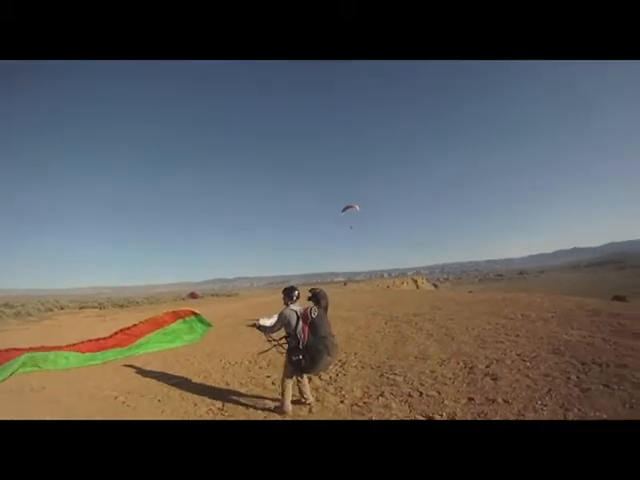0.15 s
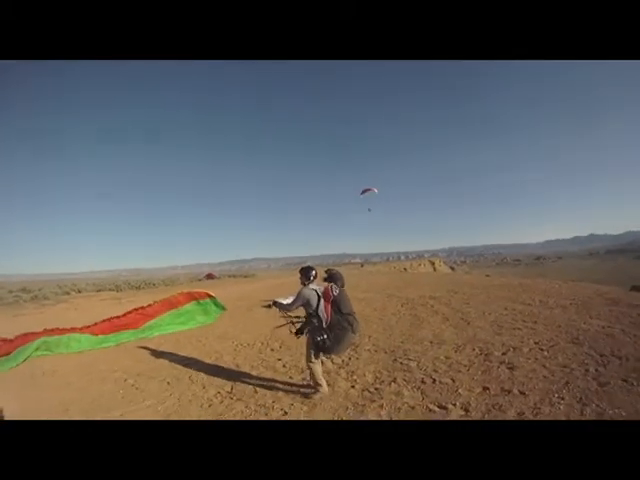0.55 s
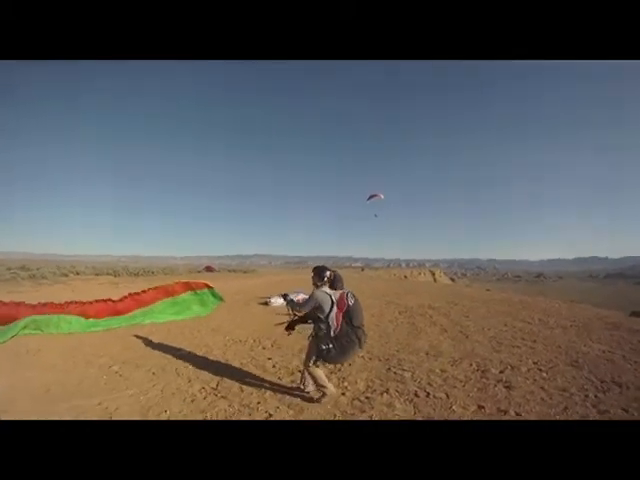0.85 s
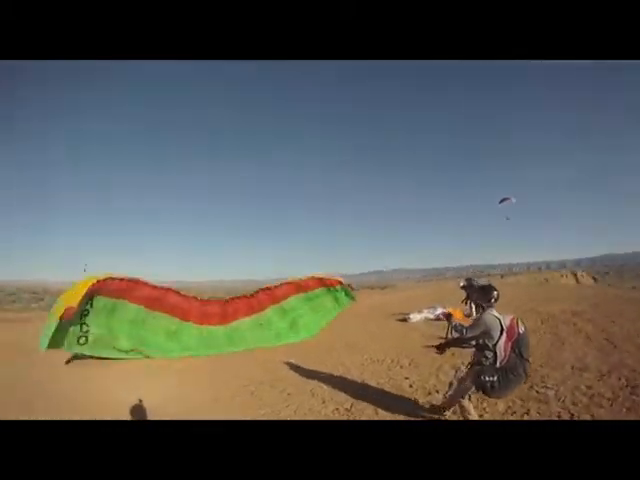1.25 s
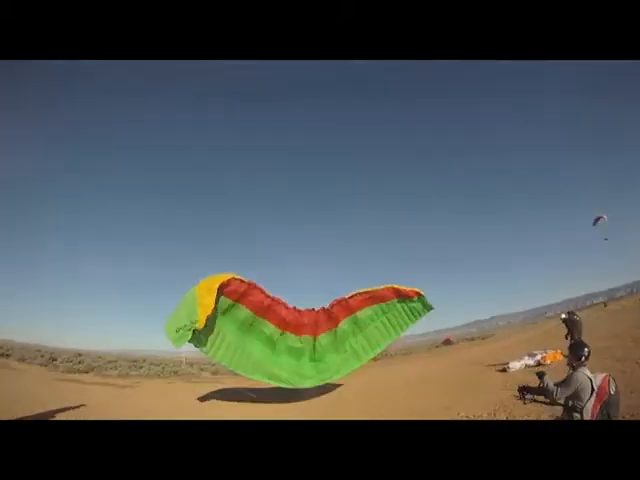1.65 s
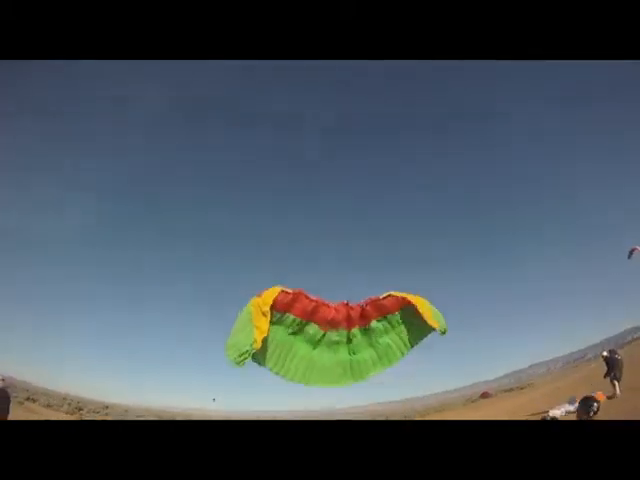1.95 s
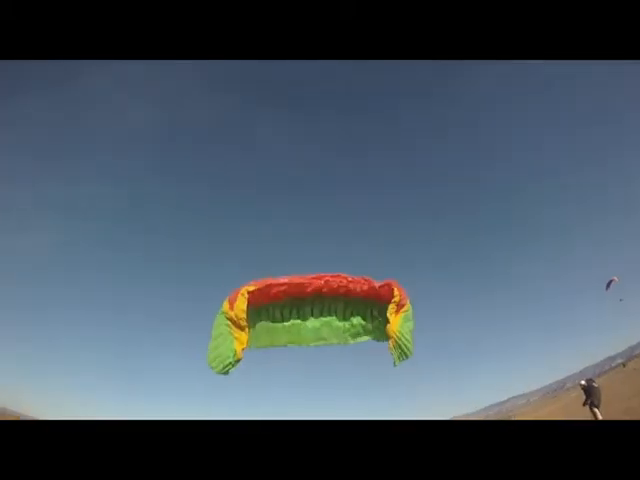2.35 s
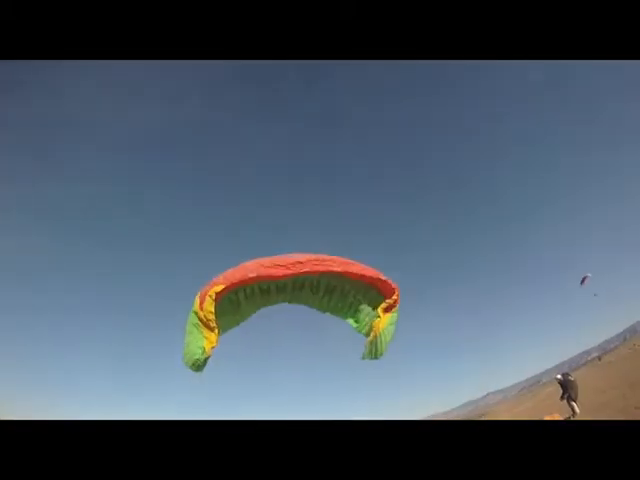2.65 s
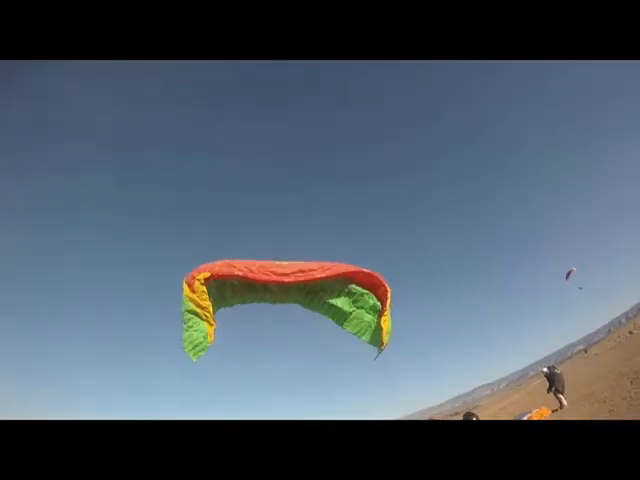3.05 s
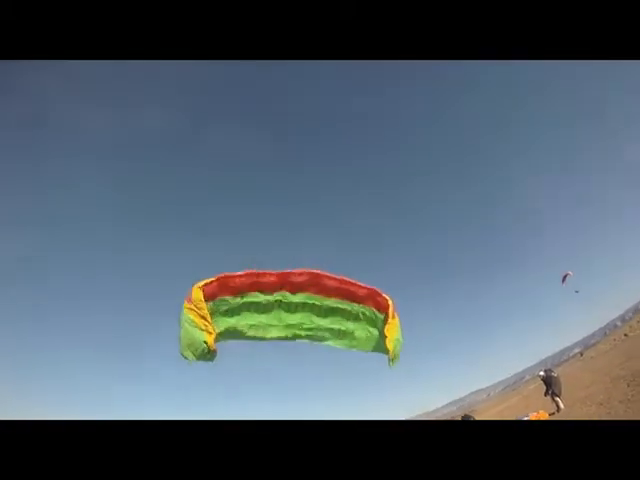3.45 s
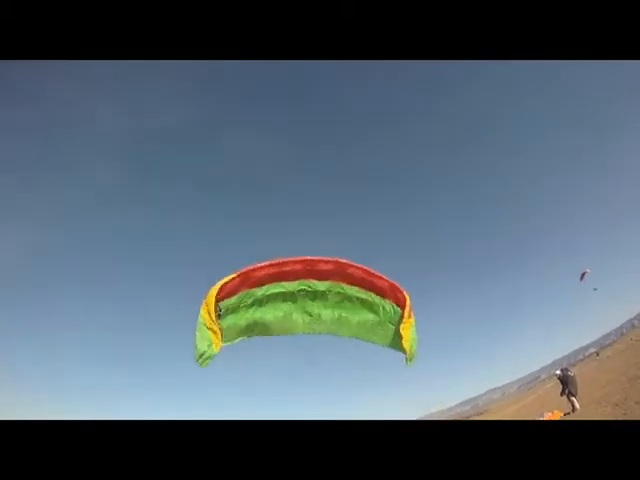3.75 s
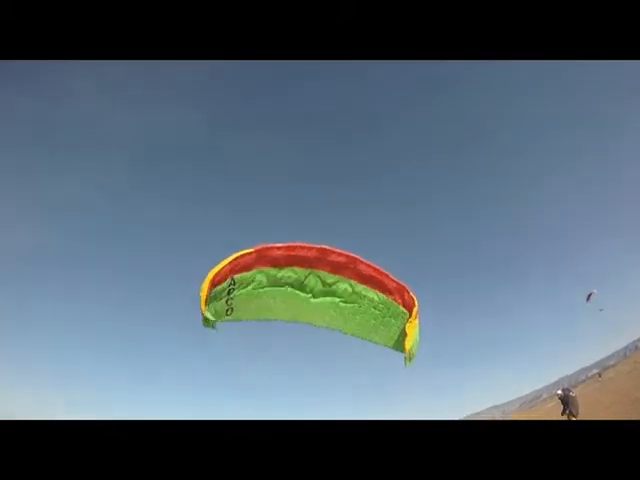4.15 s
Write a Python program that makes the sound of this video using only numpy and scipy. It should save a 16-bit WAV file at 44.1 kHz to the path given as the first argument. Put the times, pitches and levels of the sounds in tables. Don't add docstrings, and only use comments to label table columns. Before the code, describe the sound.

Outdoors on a dry, windy ridge, heard by a microphone inside a closed plastic case, so the higher sounds are boxy and coloured. From the start, deep irregular buffeting and a wandering low hum around 100 Hz pulse under faint hiss and light cloth rustle; a tiny tick comes at 0.06 s. Around 0.9 s a heavy slow gust heaves, with small ticks at 0.95 s and rougher flutter near 1.1 s. From 0.8 to 1.6 s the wing edge scrapes the soil, brightening as it lifts, while nylon crinkling and air rush grow. Crisp clicks come at 1.54 and 1.6 s, with a strong gust at 1.7 s. At 2.0 s a hard, very loud crack strikes the case, with a brief plastic ring and rattle. Then the wind eases while fabric rustle swells around 2.7 and 3.5 s; gusts thump near 3.3-3.4 s, a faint tick follows at 3.55 s, and the rustle continues to the end.

```python
import sys
import numpy as np
from scipy import signal
from scipy.fft import rfft, irfft, next_fast_len
from scipy.io import wavfile
from scipy.ndimage import uniform_filter1d, map_coordinates

SR = 44100
rng = np.random.default_rng(int(sys.argv[2]) if len(sys.argv) > 2 else 0)


def int16_out(signal):
    q = np.round(np.clip(np.atleast_2d(signal).T, -1, 1) * 32767)
    wavfile.write(sys.argv[1], SR, q.astype(np.int16))


def volts(x):
    e = np.asarray(x, float) / 20
    return 10 ** e


N = 189786
TIME = np.arange(N) / SR


def unit(x):
    return x / np.sqrt(np.mean(x ** 2) + 1e-20)


def along(points, hz):
    f, v = np.transpose(points)
    return np.interp(np.log(hz + 1), np.log(f + 1), v)


def curve(points):
    s, value = np.transpose(points)
    return np.interp(TIME, s, value)


def bump(s, half):
    return np.exp(-((TIME - s) / half) ** 2)


def wobble(rate):
    knots = rng.standard_normal(int(N * rate / SR) + 4)
    return map_coordinates(knots, [np.arange(N) * rate / SR])


def filtered(x, response):
    m = 2 * next_fast_len(N // 2 + SR // 4)
    return irfft(rfft(x, m) * response(np.fft.rfftfreq(m, 1 / SR)), m)[..., :N]


def shaped_noise(points):
    return filtered(rng.standard_normal(N), lambda hz: volts(along(points, hz)))


def patchy(patchy_db):
    z = signal.stft(rng.standard_normal(N), nperseg=512)[2]
    field = uniform_filter1d(rng.standard_normal(z.shape), 6, 0)
    field = uniform_filter1d(field, 10, 1)
    return signal.istft(z * volts(patchy_db * unit(field)), nperseg=512)[1][:N]


# [f/Hz, width/Hz, level/dB]
CASE_PEAKS = [(1195, 157, -4.5), (1576, 260, -9), (2149, 394, 0.5), (2790, 270, -10.5), (3032, 144, -8.5),
              (3320, 210, -10), (3553, 190, -6), (4063, 450, -10), (4900, 447, -13.5), (5345, 450, -14),
              (6590, 460, -17), (7060, 510, -16.5), (7910, 430, -17), (8470, 195, -14), (9000, 440, -16),
              (9800, 356, -12), (10350, 110, -23.5), (10770, 120, -22), (12000, 72, -38.5),
              (12200, 80, -30), (12600, 200, -36), (13160, 170, -24.5), (13700, 260, -24.5),
              (14280, 330, -15.5), (14640, 540, -19.5)]
# [f/Hz, width/Hz, level/dB]
CASE_NOTCHES = [(1367, 94, -6.5), (1894, 76, -5.5), (6030, 360, -10), (11500, 360, -7), (12200, 80, -12),
                (10640, 80, -7.5), (13400, 80, -5)]


def case(hz):
    grid = np.fft.rfftfreq(8192, 1 / SR)
    power = volts(-90)
    for c, width, db in CASE_PEAKS:
        power = power + volts(2 * db) / (1 + (2 * (grid - c) / width) ** 2) ** 1.57
    dips = sum(db / (1 + (2 * (grid - c) / width) ** 2) for c, width, db in CASE_NOTCHES)
    cepstrum = irfft(np.log(np.sqrt(power) * volts(dips)))
    half = len(cepstrum) // 2
    cepstrum[1:half] *= 2
    cepstrum[half + 1:] = 0
    impulse = irfft(np.exp(rfft(cepstrum)))
    return rfft(impulse, 2 * len(hz) - 2)


def through_case(x, points):
    return filtered(x, lambda hz: volts(along(points, hz)) * case(hz))


# [f/Hz, level/dB per Hz]
HISS_SPECTRUM = [(200, -7.5), (1000, -8.5), (3000, -15.5), (6000, -40.5), (8000, -34.5), (11000, -33.5),
                 (16000, -30)]


def microphone_hiss():
    return volts(-63.5) * unit(shaped_noise(HISS_SPECTRUM))


# [f/Hz, level/dB per Hz]
FAR_SPECTRUM = [(500, 10), (2000, -5.5), (4000, -7), (9000, 0), (11500, 16), (12500, 12), (16000, 1)]


def distant_wind():
    return volts(-70.5) * unit(through_case(patchy(patchy_db=2.0), FAR_SPECTRUM))


# [t/s, level/dB]
DRAG_LEVEL = [(0, -99), (.8, -73), (1.05, -67), (1.25, -62), (1.45, -60.5), (1.7, -82), (4.3, -94)]
# [f/Hz, level/dB per Hz]
SLIDE_SPECTRUM = [(3000, -31.5), (4400, 3.5), (5100, 2), (5600, -26), (6400, -16), (7300, 4), (8400, -2),
                  (10000, -27.5)]
# [t/s, share of the high colour]
LIFT = [(1.0, 0.1), (1.5, 0.9)]


def dragging_edge():
    low_scale, high_scale = 0.957, 1.04
    noise = patchy(patchy_db=3.0)
    low = filtered(noise, lambda hz: volts(along(SLIDE_SPECTRUM, hz / low_scale)) * case(hz))
    high = filtered(noise, lambda hz: volts(along(SLIDE_SPECTRUM, hz / high_scale)) * case(hz))
    lift = curve(LIFT)
    return volts(curve(DRAG_LEVEL)) * unit((1 - lift) * low + lift * high)


# [t/s, peak level/dB, t60/s, lowest f/Hz, highest f/Hz]
TICK_EVENTS = [(.0617, -33.5, .012, 3320, 3780), (.0617, -33, .014, 8200, 8840),
               (0.062, -39.5, .01, 4500, 8000), (.9465, -39, 0.019, 2800, 9000),
               (.9505, -35, 0.0071, 3020, 15000), (.9553, -40, .024, 2900, 15000),
               (1.5425, -36, 0.044, 900, 1500), (1.5425, -38, 0.02, 4000, 11000),
               (1.603, -41, .03, 2500, 12000), (1.608, -35.5, 0.014, 2500, 12000),
               (1.6122, -28, .0062, 2000, 16000), (1.6155, -31, 0.0049, 2000, 16000),
               (2.17, -56, .0087, 2500, 12000), (3.555, -44, 0.052, 2500, 11000),
               (3.728, -56, .0072, 2500, 12000)]


def ticks():
    rise_share = 0.043
    strap_db, strap_hz = -24, 9000
    out = np.zeros(N + SR)
    t = np.arange(SR // 10) / SR
    for s, db, t60, low_hz, high_hz in TICK_EVENTS:
        rise = 1 - np.exp(-t / (rise_share * t60))
        burst = rng.standard_normal(len(t)) * rise * volts(db + 18.5 - 60 * t / t60)
        band = signal.butter(2, [low_hz, high_hz], "band", fs=SR, output="sos")
        out[round(s * SR):][:len(t)] += signal.sosfilt(band, burst)
    return filtered(out[:N], lambda hz: case(hz) + volts(strap_db) / (1 + (hz / strap_hz) ** 8))


# [t/s, level/dB]
WING_LOAD = [(0, -66), (.62, -63), (.98, -62.5), (1.2, -56), (1.4, -54.5), (1.52, -52), (1.68, -54.5),
             (2.0, -55.5), (2.5, -55.5), (2.68, -53), (3.0, -57), (3.28, -57), (3.42, -53.5), (3.56, -52.5),
             (3.66, -58.5), (3.8, -56.5), (4.0, -60), (4.22, -56)]
# [f/Hz, level/dB per Hz]
RUSH_SPECTRUM = [(300, 10), (700, 1), (2500, 0), (3200, -6), (6000, -17.5), (16000, -41)]


def wing_rush():
    rush = through_case(patchy(patchy_db=0.4), RUSH_SPECTRUM)
    return volts(curve(WING_LOAD) + 1.5) * unit(rush)


# [f/Hz, level/dB per Hz]
COARSE_SPECTRUM = [(1000, -19.5), (2200, -9.5), (2800, 2), (4200, -3.5), (5000, -22), (9000, -32)]
# [f/Hz, level/dB per Hz]
FINE_SPECTRUM = [(2500, -32), (3800, -15.5), (4600, -1), (8000, 1), (16000, 1.5)]
# (middle t/s, half length/s, rise level/dB)
OPENING = (1.16, 0.15, 1.7)


def wing_creases():
    s, half, rise_db = OPENING
    strain_db = curve(WING_LOAD) + 55 + rise_db * bump(s, half)
    coarse_db = -59 + 1.46 * strain_db
    fine_db = -60.5 + 1.34 * strain_db
    size_db = 2.2 * np.minimum(rng.exponential(size=N), 4)
    creases = (rng.random(N) < .06) * rng.standard_normal(N) * volts(size_db)
    clumps = volts(0.84 * wobble(20) + 0.56 * wobble(60))
    grain = clumps * (0.6 * unit(creases) + patchy(patchy_db=0.1))
    coarse = unit(through_case(grain, COARSE_SPECTRUM))
    fine = unit(through_case(grain, FINE_SPECTRUM))
    return volts(coarse_db - 0.8) * coarse + volts(fine_db + 0.07) * fine


# [t/s, level/dB]
WIND_STRENGTH = [(0, -53), (.2, -49), (.5, -48), (.7, -50.5), (1.0, -51), (1.3, -54), (1.6, -53),
                 (1.95, -51), (2.3, -56), (2.9, -58.5), (3.2, -55.5), (3.7, -57), (4.0, -58), (4.3, -58)]
# [middle t/s, half length/s, rise level/dB]
GUSTS = [(.05, 0.018, 5.5), (0.588, 0.039, -11), (0.833, 0.065, 7.5), (0.987, .03, 4.5), (1.409, 0.031, 7),
         (1.57, .03, 6.5), (1.707, .04, 10), (1.86, 0.045, 2.5), (2.495, 0.036, 4.5), (2.66, 0.037, -4.5),
         (2.77, .05, 5), (3.102, 0.027, -2), (3.283, 0.032, 11.5), (3.42, 0.018, 8), (3.74, .03, -2),
         (3.97, .04, 2.5)]
# [f/Hz, level/dB per Hz]
PUSH_SPECTRUM = [(8, -37.5), (15, -0.5), (31, -2), (60, -5.5), (80, -8.5), (110, -18.5), (170, -35.5),
                 (290, -120)]


def buffeting():
    level_db = curve(WIND_STRENGTH) + sum(db * bump(s, half) for s, half, db in GUSTS)
    buffet = shaped_noise(PUSH_SPECTRUM)
    buffet /= uniform_filter1d(np.abs(buffet), 2600) ** 0.68
    return volts(level_db + 1.96) * unit(buffet)


# [middle t/s, half length/s, peak level/dB]
EDDY_SPELLS = [(0.045, 0.024, -55), (0.164, 0.047, -55.5), (.36, 0.054, -53), (.52, 0.052, -57),
               (0.626, 0.044, -51.5), (0.733, 0.053, -55), (0.905, 0.019, -62), (1.051, 0.033, -46),
               (1.14, 0.038, -50.5), (1.494, 0.043, -50), (1.593, .04, -53.5), (1.795, 0.05, -45.5),
               (1.966, 0.06, -48.5), (2.17, 0.056, -55.5), (2.33, 0.065, -56), (2.482, 0.033, -58.5),
               (2.687, .06, -57), (2.836, 0.031, -53), (3.054, 0.044, -61), (3.194, .06, -55.5),
               (3.33, 0.028, -57), (3.46, .03, -58), (3.6, 0.063, -60), (3.856, 0.043, -56),
               (3.985, 0.034, -55), (4.124, 0.027, -55.5), (4.268, 0.036, -56.5)]


def eddy_tone():
    eddy_hz = 102.7
    gain = volts(curve(WIND_STRENGTH) - 19)
    gain = gain + sum(volts(db) * bump(s, half) for s, half, db in EDDY_SPELLS)
    phase = 2 * np.pi * np.cumsum(eddy_hz * (1 + 0.0448 * wobble(22))) / SR
    return gain * unit(np.sin(phase) * volts(1.7 * wobble(27.07)))


# [f/Hz, level/dB per Hz]
FLUTTER_SPECTRUM = [(90, -10.5), (140, 2), (200, -3), (300, -7), (500, -16.5), (800, -21.5), (1500, -41)]
# (middle t/s, half length/s, rise level/dB)
RATTLE = (1.136, 0.11, 6.6)


def flutter():
    strength_db = curve(WIND_STRENGTH)
    s, half, rise_db = RATTLE
    level_db = -68.5 + 0.46 * (strength_db - strength_db.mean()) + rise_db * bump(s, half)
    noise = volts(0.28 * wobble(12)) * shaped_noise(FLUTTER_SPECTRUM)
    noise /= uniform_filter1d(np.abs(noise), 1300) ** 0.26
    return volts(level_db + 2.0) * unit(noise)


# (middle t/s, half length/s, level/dB, f/Hz)
HEAVE = (.865, .065, -31, 21)
# [t/s, level/dB, f/Hz, t60/s]
THUMPS = [
    (.905, -39, 29, 0.11),
    (3.417, -43, 215, 0.084),
    (1.03, -52, 220, .1),
    (1.105, -49, 206, 0.12),
]


def gust_blows():
    s, half, db, hz = HEAVE
    out = -volts(db) * bump(s, half) * np.cos(2 * np.pi * hz * (TIME - s))
    for s, db, hz, t60 in THUMPS:
        t = np.maximum(TIME - s, 0)
        rise = 1 - np.exp(-(t * hz / 0.32) ** 2)
        out += volts(db - 60 * t / t60) * rise * np.sin(2 * np.pi * hz * t)
    return out


# (t/s, level/dB, rise/s)
CRACK = (2.0119, -7, 0.00057)
# [f/Hz, level/dB, t60/s]
SHELL_MODES = [(181, -28, 0.018), (530, -19, 0.011), (672, -22, 0.031), (804, -41, 0.0099),
               (918, -27, 0.069), (1190, -4, 0.022), (1560, -9.5, 0.012), (1760, -17.5, 0.035),
               (2150, 4, 0.012), (2880, -9, 0.0085), (3260, -7, 0.0095), (3460, -7, 0.011),
               (4170, 5, 0.0074), (4520, -4.5, 0.0086), (4800, -12.5, 0.0086), (6050, -17.5, 0.0069),
               (6860, -12, 0.0077), (7790, -0.5, 0.0085), (8600, -20, 0.011), (9000, -18, 0.013),
               (9900, -8.5, 0.011), (10230, -25, 0.016), (10790, -22.5, 0.022), (13140, -20, 0.016),
               (14200, -12, 0.014), (13800, -22, 0.013), (14400, -25, .012)]
# (level/dB, f/Hz, t60/s)
REBOUND = (-27, 56, 0.092)


def crack():
    s, db, rise = CRACK
    t = np.arange(SR // 5) / SR
    swell = (1 - np.exp(-t / rise)) ** 2
    modes = sum(volts(level - 60 * t / t60) * np.sin(2 * np.pi * (hz * t + rng.random()))
                for hz, level, t60 in SHELL_MODES)
    shove_db, shove_s = -11, .0004
    shove = volts(shove_db) * t / shove_s * np.exp(1 - t / shove_s)
    back_db, back_hz, back_t60 = REBOUND
    rebound = volts(back_db - 60 * t / back_t60) * np.sin(2 * np.pi * back_hz * t)
    ring, rattle = np.zeros((2, N))
    start = round(s * SR)
    ring[start:][:len(t)] = swell * modes + shove - rebound
    rattle[start:][:len(t)] = volts(10.5 - 60 * t / 0.015) * swell * rng.standard_normal(len(t))
    return volts(db) * (1.69 * ring + filtered(rattle, case))


def scene():
    background = distant_wind() + dragging_edge()
    cloth = ticks() + wing_rush() + wing_creases()
    wind = buffeting() + eddy_tone() + flutter() + gust_blows()
    return (background + cloth + wind + crack())[None]


def band_limit(x):
    return signal.sosfilt(signal.butter(12, 16490, fs=SR, output="sos"), x)


def record(dry):
    top_hz = 15325
    x = dry + microphone_hiss()
    x = x / (1 + np.abs(x / 3.0) ** 4) ** (1 / 4)
    x = filtered(x, lambda hz: volts(-19 - 19 * np.tanh((hz - top_hz) / 45)))
    return band_limit(x)


dry = scene()
out = record(dry)
int16_out(out)
```